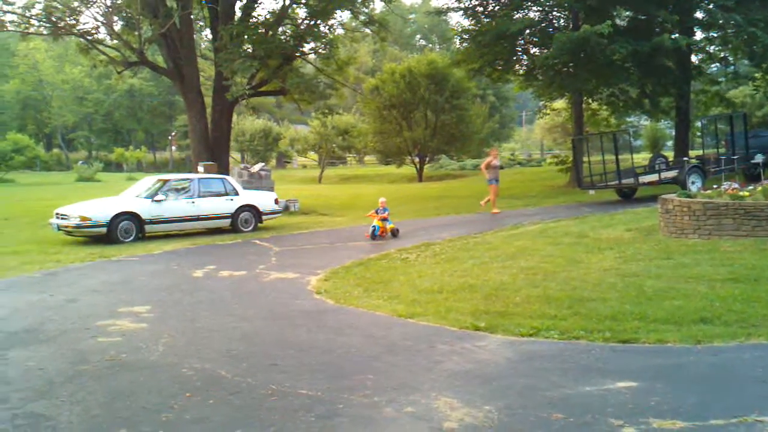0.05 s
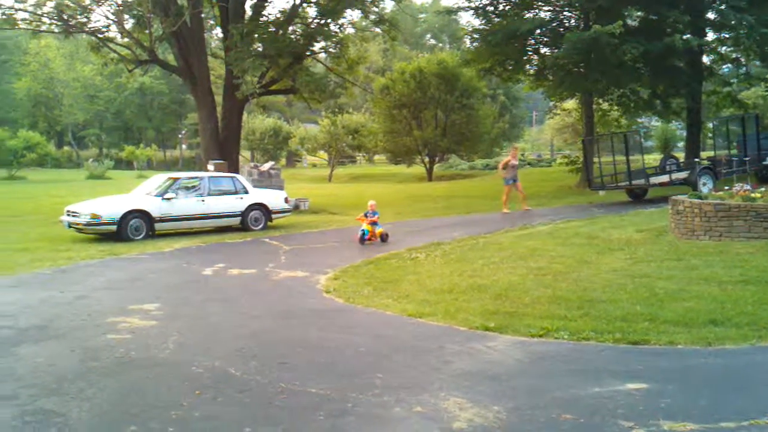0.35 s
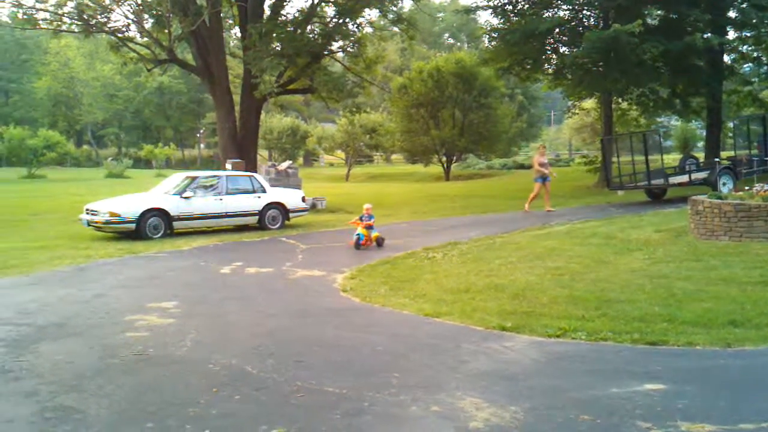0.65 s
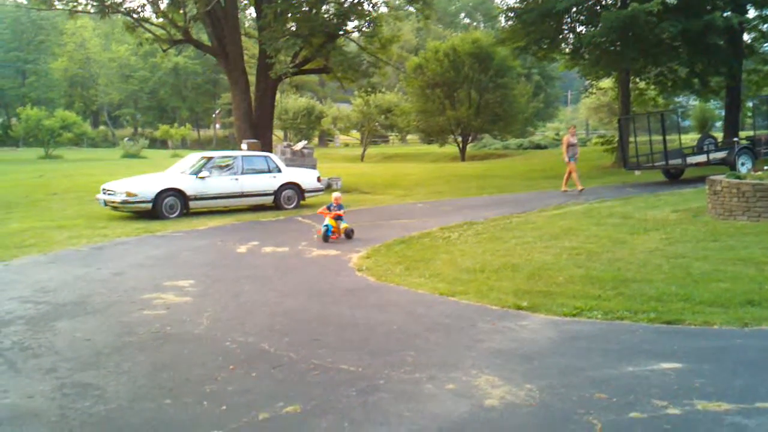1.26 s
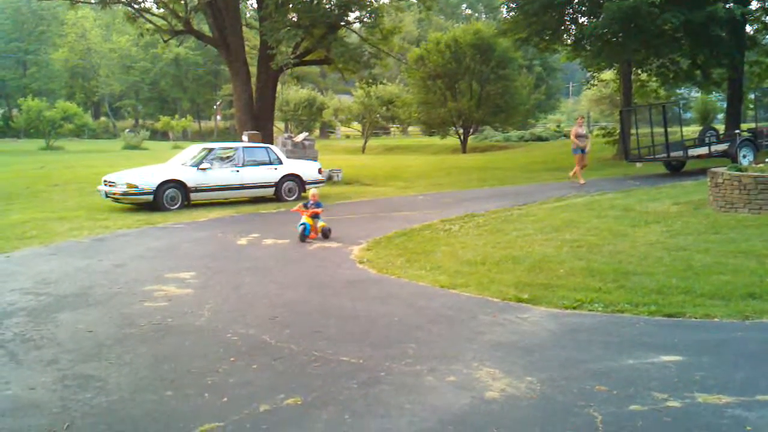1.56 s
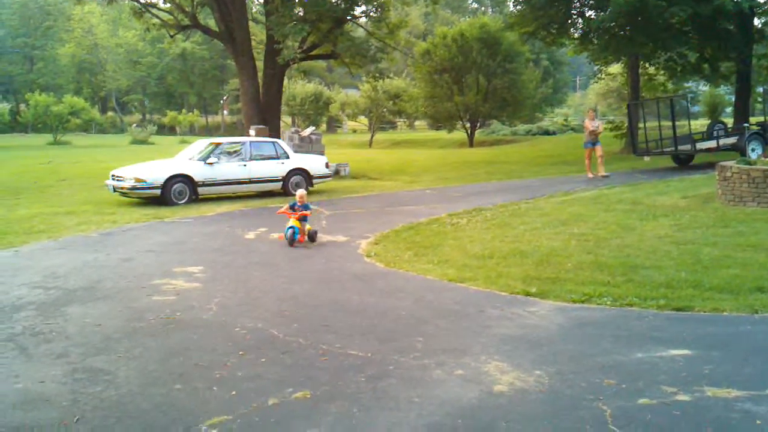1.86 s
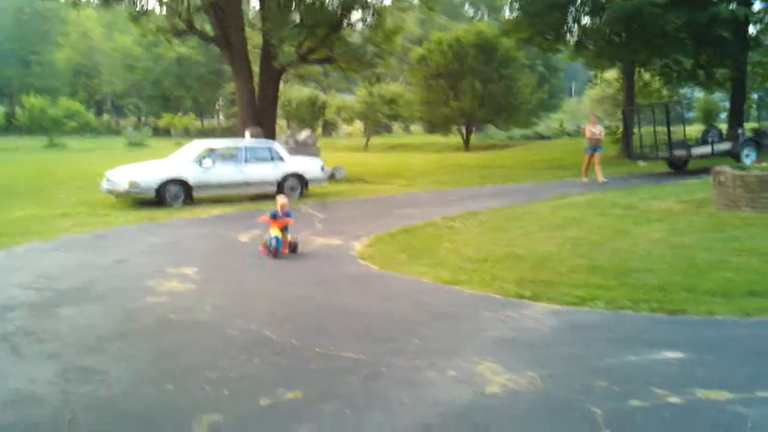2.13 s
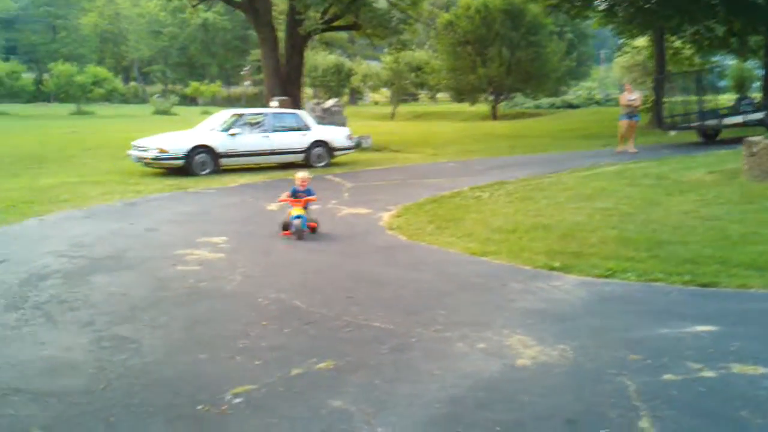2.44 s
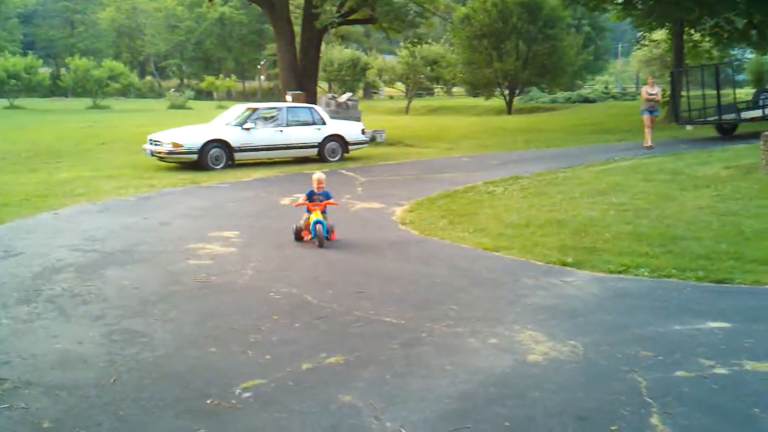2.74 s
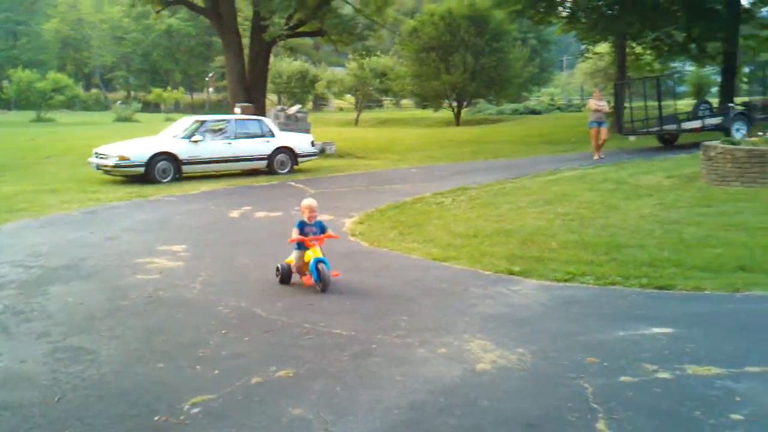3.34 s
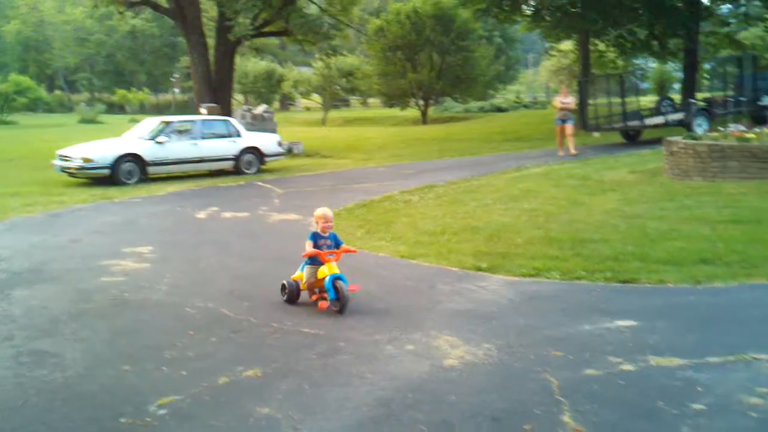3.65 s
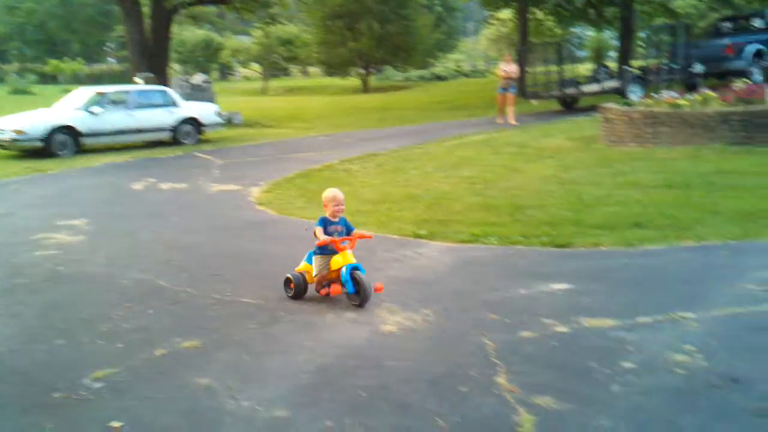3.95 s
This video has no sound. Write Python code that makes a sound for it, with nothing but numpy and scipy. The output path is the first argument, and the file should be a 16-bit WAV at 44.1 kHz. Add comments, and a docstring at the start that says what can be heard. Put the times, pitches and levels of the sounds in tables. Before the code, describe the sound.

A plastic tricycle rolls on a paved driveway, its hollow wheels rumbling faintly at first. From about 1.5 seconds the rumble swells, with irregular clacks and judders as the wheels hit bumps and stones. Sand crackles lightly under the treads from around 2 seconds. The rolling is closest and loudest from 3.3 to 4 seconds, over a faint hush of leaves and distant air.

```python
"""A paved driveway, a hand-held phone, and a child's plastic tricycle rolling down towards it.
Grit drums on the hollow wheels, bumps make them judder and clack, and sand crunches under the treads.
The rumble grows as the tricycle gathers speed and comes close to the microphone.
Behind it are leaves, distant air and a faint echo off the yard."""
import sys
import numpy as np
from scipy import signal
from scipy.fft import rfft, irfft
from scipy.io import wavfile
from scipy.ndimage import uniform_filter1d

SR = 44100
rng = np.random.default_rng(int(sys.argv[2]) if len(sys.argv) > 2 else 0)


def store_wav(level_fs):
    """Save 16-bit WAV to argv[1]."""
    pcm = np.round(np.clip(np.atleast_2d(level_fs), -1, 1) * 32767)
    wavfile.write(sys.argv[1], SR, pcm.T.astype(np.int16))


N = 176400

# response of the hollow wheels and frame: f/Hz, level/dB
SHELL = [(30, -61), (70, -54), (115, -25), (170, -6), (250, -5.5), (340, 0), (470, -4.5), (580, 0),
         (780, -1), (945, -2), (1120, -9), (1300, 0.5), (1570, -2.5), (1780, -13.5), (2120, -6),
         (2450, -13.5), (2850, -20), (4500, -40.5), (14000, -74)]
# tone of a heavier, softer push on the wheel: f/Hz, level/dB
BUMP_TONE = [(150, -2), (400, 3.5), (800, 2.5), (1400, 1), (2400, 3)]
# a wheel drops off a stone with one hollow clack: t/s, relative peak level/dB, strongest ring f/Hz
CLACKS = [(.722, -22.5, 654), (1.219, -18.5, 1220), (1.489, -27, 1230), (1.593, -17, 1460),
          (1.669, -19.5, 870), (1.709, -13, 1440), (1.778, -20.5, 855), (1.931, -15, 1350),
          (2.123, -11, 920), (2.229, -17, 870), (2.445, -14, 680), (2.574, -15, 700), (2.741, -14.5, 900),
          (2.827, -15, 750), (2.913, -12.5, 755), (3.082, -14, 700), (3.235, -10, 766), (3.318, -9.5, 700),
          (3.328, -14.5, 970), (3.502, -9.5, 1500), (3.607, -8, 764), (3.618, -13, 865), (3.625, -14, 810),
          (3.633, -9, 1020), (3.925, -10, 940), (3.939, -12, 630), (3.98, -10, 880)]
RING_T60_S, WALL_WIDTH_HZ = 0.16, 106  # decay of the plastic, width of one wall mode


def undb(db):
    """Decibels to gain."""
    return 10 ** (np.asarray(db) / 20)


def unit(x):
    """Scale to rms 1."""
    return x / np.sqrt(np.mean(x ** 2))


def bins():
    """Frequencies of the spectrum, in Hz."""
    return np.maximum(np.arange(N // 2 + 1) * SR / N, 1)


def across(table, column=1):
    """A column of a table read along log frequency."""
    table = np.array(table, float)
    return np.interp(np.log(bins()), np.log(table[:, 0]), table[:, column])


def colour(x, table):
    """Minimum-phase filter through points of f/Hz, level/dB."""
    cepstrum = irfft(np.log(undb(across(table))), N)
    cepstrum[1:N // 2] *= 2
    cepstrum[N // 2 + 1:] = 0
    return irfft(rfft(x) * np.exp(rfft(cepstrum)), N)


def resonate(x, hz, width_hz):
    """One resonance, gain 1 at its centre."""
    return signal.lfilter(*signal.iirpeak(hz, hz / width_hz, fs=SR), x)


def wobble(per_s, spread_db):
    """A gain that wanders smoothly at random."""
    hold = max(int(SR / per_s), 1)
    steps = rng.standard_normal(N)[np.arange(N) // hold]
    return undb(spread_db * unit(uniform_filter1d(steps, hold)))


def grains(per_s, spread_db):
    """Randomly timed clicks, mostly small and a few large."""
    size = undb(spread_db * np.minimum(rng.exponential(size=N), 4))
    return (rng.random(N) < per_s / SR) * size * rng.choice([-1, 1], N)


def tail(x, t60_s):
    """Dense random ringing that dies away after the sound."""
    t = np.arange(SR) / SR
    response = rng.standard_normal(SR) * np.exp(-np.log(1000) * t / t60_s)
    return signal.fftconvolve(x, response / np.linalg.norm(response))[:N]


def add(out, x, at, db):
    """Mix in a short sound at a time and a peak level."""
    start = int(at * SR)
    out[start:start + len(x)] += (undb(db) * x / np.abs(x).max())[:N - start]


def yard_air():
    """Leaves and distant air: a steady, wide bed of noise."""
    # spectrum of the yard: f/Hz, level/dB
    air_tone = [(30, -48), (90, -23.5), (200, 5), (450, 2), (700, -13.5), (2000, -2.5), (2800, -12.5),
                (4200, -16), (14000, -33)]
    return unit(colour(rng.standard_normal((2, N)), air_tone))


def yard_echo(x):
    """The yard throws back a short wash, different left and right."""
    return np.array([tail(x, t60_s=0.53) for _ in range(2)])


def flicker(x):
    """Sand grains of changing size: each band swells and fades by itself."""
    # band centres of the crackle: f/Hz
    centres = [1500, 3500, 4600, 6600, 8500, 11000, 13500]
    spectrum = rfft(x)
    bands = [irfft(spectrum * np.interp(bins(), centres, share), N) for share in np.eye(len(centres))]
    return sum(band * wobble(per_s=28, spread_db=3) for band in bands)


def snaps(t60_s=0.021):
    """Grains of grit crack under a tread with a short bright tick; the first tick, at 1.436 s, comes from the
    plastic instead."""
    # cracking grains, and at 1.436 s a tick of the plastic: t/s, relative peak level/dB, ring f/Hz
    cracks = [(1.436, -32, 2900), (2.205, -26, 13500), (2.376, -38, 13800), (2.685, -32, 8500),
              (2.886, -30, 13500), (3.44, -21, 13600), (3.453, -27, 13600), (3.694, -21, 6800),
              (3.788, -23.5, 8340)]
    t, out = np.arange(SR // 10) / SR, np.zeros(N)
    for at, db, hz in cracks:
        crack = rng.standard_normal(len(t)) * np.exp(-np.log(1000) * t / t60_s)
        add(out, resonate(crack, hz, width_hz=1100), at, db)
    return out


def sand(gain):
    """Fine sand crackles under the treads, differently at each microphone port; a few grains snap."""
    # a tread scuffs over loose sand: centre t/s, relative level/dB, half-power length/s
    scuffs = [(.642, -49, 0.05), (.912, -52, 0.012), (1.6, -40, 0.025), (1.93, -44, 0.017),
              (2.22, -52, 0.023), (2.42, -37, .028), (2.548, -42.5, 0.03), (2.684, -36.5, 0.013),
              (2.89, -43, 0.012), (2.935, -40.5, 0.029), (3.152, -38, 0.023), (3.396, -36, 0.017),
              (3.442, -48, 0.007), (3.694, -42, 0.012), (3.794, -38, 0.015), (3.987, -35.5, 0.011)]
    # spectrum of crushed sand: f/Hz, level/dB
    sand_tone = [(300, -39), (2000, 8.5), (3000, -3.5), (3500, 2.5), (4600, 0.5), (5400, -8), (6500, 5.5),
                 (8600, 4), (9800, -3.5), (12500, -4.5), (13600, -2.5), (14500, -5)]
    t = np.arange(N) / SR
    rolling = undb(3) * gain * wobble(per_s=60, spread_db=0.38)
    scuff_power = sum(undb(db) ** 2 * .5 ** ((2 * (t - at) / length) ** 2) for at, db, length in scuffs)
    level = rolling + undb(1) * np.sqrt(scuff_power)
    crushed = np.array([colour(grains(per_s=6000, spread_db=3), sand_tone) for _ in range(2)])
    crackle = unit(flicker(crushed))
    return level * crackle + undb(3.5) * np.array([snaps() for _ in range(2)])


def shell(push):
    """The hollow plastic answers a push and rings briefly, differently at each point of the wheel."""
    decay = np.exp(-np.log(1e6) / (RING_T60_S * SR))
    energy = signal.lfilter([1 - decay], [1, -decay], push ** 2 + 1e-18)
    ring = np.sqrt(energy) * rng.standard_normal(N)
    return colour(push + undb(-4) * ring, SHELL)


def drum(clicks):
    """Contacts under a steady load strike the shell."""
    load = np.sqrt(uniform_filter1d(clicks ** 2, size=1100) + np.mean(clicks ** 2) / 20)
    return unit(shell(clicks / load))


def hollow(x, hz):
    """The wall mode nearest the point of contact rings out above the rest."""
    return x + undb(5) * resonate(x, hz, WALL_WIDTH_HZ)


def knocks():
    """Coarse stones knock on the treads, each waking its own mix of wall modes."""
    # modes of the hollow wheel walls: f/Hz, level/dB
    wall_modes = [(340, -4.5), (600, 0.5), (770, -1), (930, -5.5), (1280, 2), (1500, -7), (2100, -7.5)]
    stones = grains(per_s=90, spread_db=0.9)
    return unit(sum(undb(db) * resonate(stones * rng.uniform(-0.89, 1, N), hz, WALL_WIDTH_HZ)
                    for hz, db in wall_modes))


def bumps():
    """Each bump is a quick, even run of contacts that rings one wall mode most."""
    # bumps in the paving: centre t/s, relative level/dB, half-power length/s, strongest ring f/Hz
    jolts = [(0.152, -39.5, .011, 610), (0.248, -40.5, 0.054, 1270), (0.432, -40.5, 0.016, 770),
             (0.587, -40, .017, 730), (0.663, -38.5, 0.017, 690), (0.76, -34.5, 0.025, 830),
             (0.805, -34.5, .015, 700), (0.869, -37, 0.016, 650), (1.02, -34.5, 0.017, 613),
             (1.078, -33.5, 0.026, 1300), (1.226, -30.5, 0.013, 1190), (1.264, -36, .018, 800),
             (1.494, -32.5, 0.017, 1230), (1.553, -27, .021, 880), (1.6, -27, 0.02, 1460),
             (1.704, -30.5, 0.023, 1480), (1.799, -28, .017, 820), (1.935, -25.5, 0.029, 1390),
             (2.049, -30, 0.017, 735), (2.118, -22, .017, 590), (2.235, -23.5, .032, 940),
             (2.304, -25.5, 0.028, 720), (2.449, -25.5, 0.018, 735), (2.518, -31, 0.034, 700),
             (2.57, -31, 0.017, 710), (2.657, -26, .011, 770), (2.694, -28, 0.027, 760),
             (2.881, -25, 0.022, 794), (2.93, -22.5, 0.022, 600), (3.033, -23, 0.017, 1330),
             (3.093, -28, 0.034, 660), (3.159, -24.5, 0.027, 1290), (3.232, -23.5, 0.022, 815),
             (3.32, -24.5, 0.019, 940), (3.41, -25.5, 0.013, 1550), (3.468, -22.5, .028, 960),
             (3.519, -22.5, 0.026, 860), (3.594, -20, 0.022, 900), (3.626, -20, 0.025, 840),
             (3.701, -20.5, 0.016, 720), (3.798, -24.5, 0.031, 790), (3.925, -21, 0.026, 940),
             (3.986, -23.5, .012, 845)]
    judder = colour(drum(grains(per_s=700, spread_db=1.5)), BUMP_TONE)
    t, out = np.arange(N) / SR, np.zeros(N)
    for at, db, length, hz in jolts:
        near = np.abs(t - at) < .1
        run = hollow(judder[near], hz)
        load = np.sqrt(uniform_filter1d(run ** 2, size=500))
        swell = .5 ** (2 * ((t[near] - at) / length) ** 2)
        out[near] += undb(db) * swell * run / load
    return out


def clacks():
    """A wheel drops off a stone: single blows on the shell, each with its own hollow note."""
    impulse = np.eye(1, N)[0]
    blow = colour(colour(impulse, SHELL), BUMP_TONE)[:SR // 10]
    out = np.zeros(N)
    for at, db, hz in CLACKS:
        add(out, hollow(blow, hz), at, db)
    return out + undb(-3) * tail(out, RING_T60_S)


def ground_contact(hop_s=.014, depth=.55):
    """Before each clack the wheel hops, so the rumble thins for a moment."""
    t = np.arange(N) / SR
    aloft = sum(np.exp(-(2 * (t - at + hop_s / 2) / hop_s) ** 4) for at, _, _ in CLACKS)
    return 1 - depth * np.minimum(aloft, 1)


def wheels(gain, edge_hz=1100):
    """Grit and stones rumble unevenly under the wheels; bumps add judder and single clacks."""
    # lift above edge_hz as the rattle thins and fills on the approach: t/s, level/dB
    rattle = [(0, 3), (.8, -3), (1.2, 2), (1.65, 5), (2.2, 2), (3, -0.5), (3.6, 1), (4, 2.5)]
    t = np.arange(N) / SR
    grit = drum(grains(per_s=700, spread_db=2.07)) * unit(wobble(per_s=60, spread_db=1.14))
    rumble = ground_contact() * gain * unit(grit + undb(-4.5) * knocks())
    body = undb(0.21) * rumble + undb(1.3) * bumps() + clacks()
    upper = irfft(rfft(body) / (1 + (edge_hz / bins()) ** 4), N)
    lift = undb(np.interp(t, *np.array(rattle).T))
    return body + upper * (lift - 1)


def at_ports(x):
    """The direct sound reaches the phone's two microphone ports with different level and phase."""
    # left port against right: f/Hz, level/dB, phase lead/rad
    ports = [(61.5, -2, 13.5), (197, 6, -0.4), (396, 7.5, 0.07), (495, 6, 2.5), (540, 10.5, 0.74),
             (697, -3.5, -1.5), (1000, 8.5, 1.3), (1340, -31, 1.5), (1520, -4.5, 1), (1750, -22, 0.95),
             (2157, -6.5, 2.16), (2400, 2.5, 4), (2856, -7, 4), (3820, 22, 0), (3880, -11, 4)]
    lean = undb(across(ports) / 2)
    pair = np.array([lean, np.exp(-1j * across(ports, column=2)) / lean])
    pair_rms = np.sqrt((lean ** 2 + lean ** -2) / 2)
    return irfft(rfft(x) * pair / pair_rms, N)


def scene():
    """From where the phone is held: wheels and sand coming closer, over the yard's echo and air."""
    # steady rolling, set by speed and distance: t/s, relative rumble level/dB, relative sand level/dB
    approach = [(0, -41.5, -56), (0.1, -44.5, -54.5), (0.27, -43.5, -50), (0.55, -41.5, -52),
                (1.0, -37, -49.5), (1.3, -36.0, -49), (1.47, -37.0, -48), (1.62, -33.5, -48.5),
                (1.76, -29.5, -46.5), (1.87, -30.5, -40.5), (2.03, -30, -47.5), (2.17, -28.5, -40.5),
                (2.35, -28, -41.5), (2.62, -28, -45.5), (2.85, -25, -39), (3.06, -27, -41.5),
                (3.2, -27, -37.5), (3.33, -24, -37), (3.55, -23.5, -33), (3.67, -23.5, -37.5),
                (3.85, -26, -38.5), (4, -23, -33.5)]
    times, rumble_db, sand_db = np.array(approach).T
    t = np.arange(N) / SR
    fades = np.clip(np.minimum(t, t[-1] - t) / .005, 0, 1)
    body = fades * wheels(undb(np.interp(t, times, rumble_db)))
    pan_db = np.linspace(-0.5, 1.5, N)  # the path drifts a little to the left
    direct = at_ports(body) * undb(np.array([pan_db, -pan_db]) / 2)
    yard = undb(-14.5) * yard_echo(body) + undb(-45) * yard_air()
    return yard + sand(undb(np.interp(t, times, sand_db))) + direct


def record(dry, spacing_hz=2580, fade_hz=8000, top_hz=13950):
    """The phone's stereo widening notches mid and side in turn, less so in the treble; the top is cut."""
    turn = np.pi * bins() / spacing_hz
    depth = 1 / (1 + (bins() / fade_hz) ** 4)

    def notch(x, comb, width):
        """Dip the spectrum wherever the comb crosses zero."""
        return irfft(rfft(x) * (1 - depth * width ** 2 / (comb ** 2 + width ** 2)), N)

    mid_comb = np.where(bins() > spacing_hz / 2, np.sin(turn), 1)
    mid = notch((dry[0] + dry[1]) / 2, mid_comb, width=0.2)
    side = notch((dry[0] - dry[1]) / 2, np.cos(turn), width=0.45)
    low_pass = signal.ellip(10, .2, 80, top_hz, fs=SR, output="sos")
    return signal.sosfilt(low_pass, np.array([mid + side, mid - side]))


dry = scene()
out = record(dry)
store_wav(out)
```